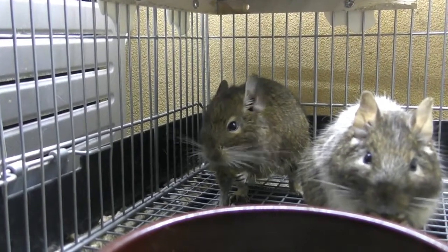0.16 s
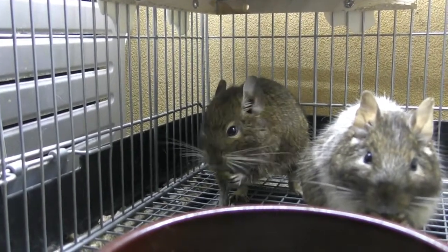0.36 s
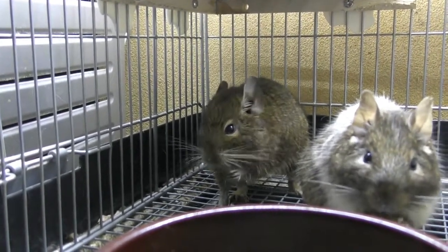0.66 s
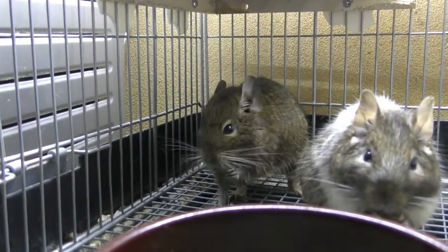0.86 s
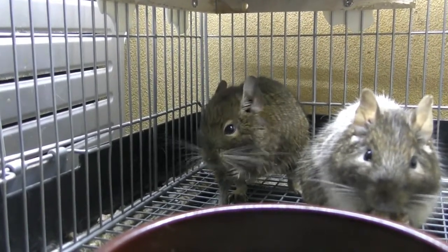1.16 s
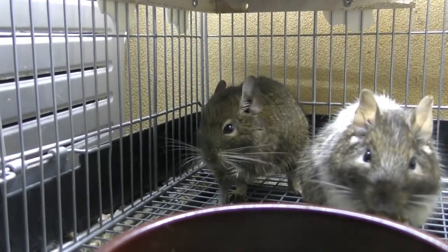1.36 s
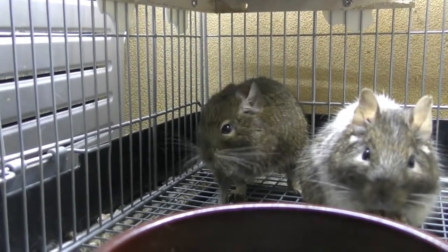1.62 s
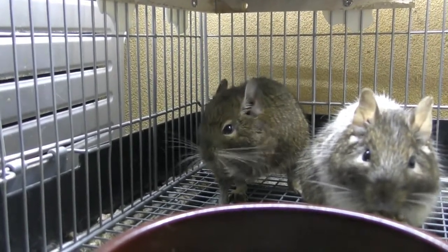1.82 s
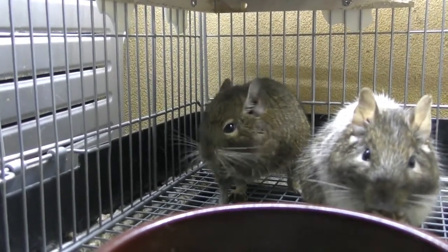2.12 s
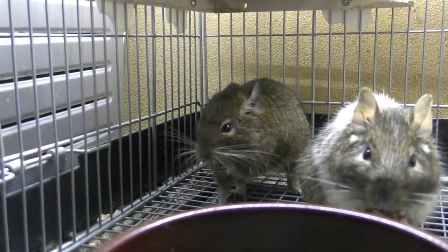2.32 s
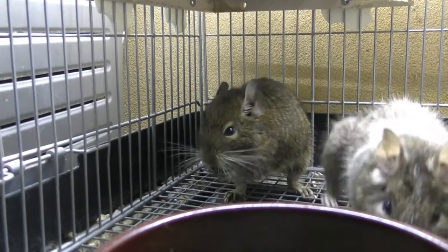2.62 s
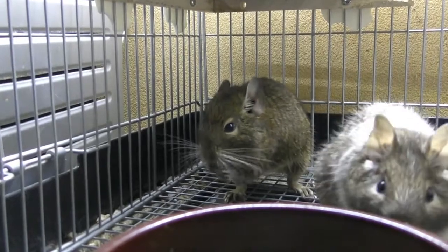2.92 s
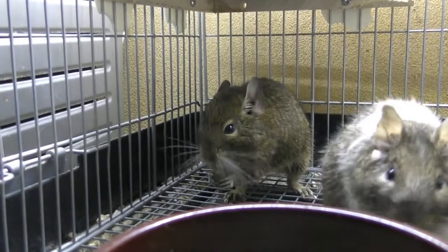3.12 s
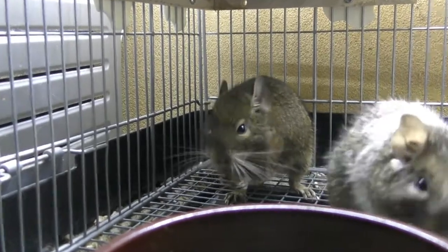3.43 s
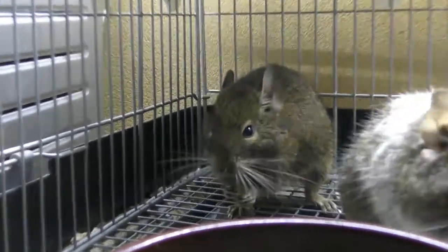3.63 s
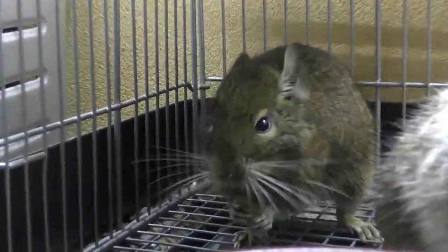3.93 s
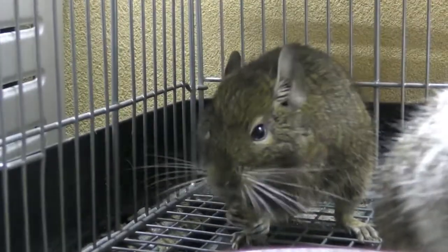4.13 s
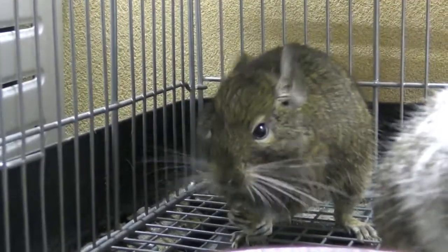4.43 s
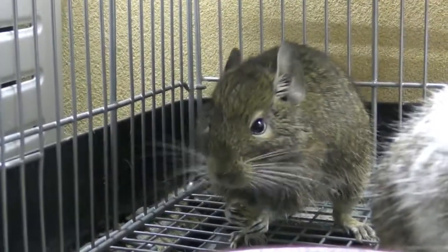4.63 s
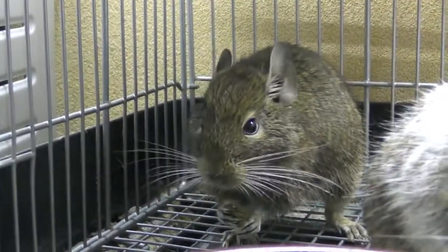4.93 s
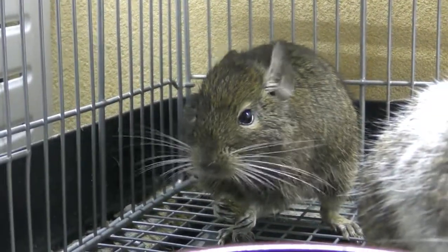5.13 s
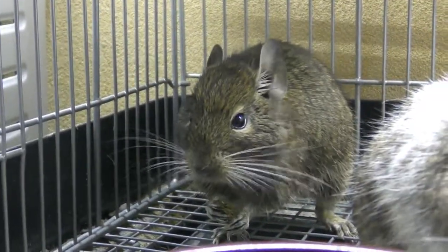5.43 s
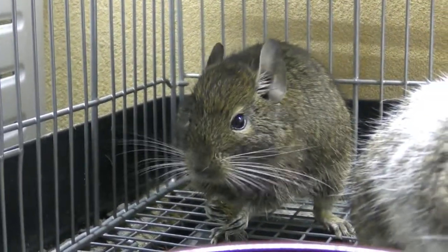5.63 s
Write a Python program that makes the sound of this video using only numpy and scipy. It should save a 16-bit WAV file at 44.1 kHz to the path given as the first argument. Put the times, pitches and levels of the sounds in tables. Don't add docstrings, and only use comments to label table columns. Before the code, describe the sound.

Indoors, close to a camera microphone, a degu in a wire cage gives short, piercing, whistle-like squeaks with rough edges, roughly two per second. A hollow wheel rumbles low at first and rolls to a stop within a second. Quick soft sniffs, sharp claw ticks on the wire floor and faint fur rustle fill the gaps, over steady fan rush with a thin whine.

```python
import sys
import numpy as np
from scipy import signal
from scipy.fft import rfft, irfft, next_fast_len
from scipy.io import wavfile
from scipy.ndimage import uniform_filter1d, minimum_filter1d, map_coordinates

SR = 44100
rng = np.random.default_rng(int(sys.argv[2]) if len(sys.argv) > 2 else 0)


def log_audio(samples):
    frames = np.atleast_2d(samples).T
    limited = np.clip(frames, -1, 1)
    pcm = np.round(limited * 32767).astype(np.int16)
    wavfile.write(sys.argv[1], SR, pcm)


def gain_from_db(level_db):
    decades = np.asarray(level_db, float) / 20
    return 10 ** decades


N = 254016

# [t/s, f/Hz]
SQUEAK_PITCHES = [
    [(.010, 3470), (.019, 3550), (.033, 4100), (.04, 3990), (.052, 4030), (.058, 4254)],
    [(.557, 4040), (.57, 4148)],
    [(.596, 4090), (.601, 4195)],
    [(.998, 2650), (1.015, 3350), (1.021, 3920), (1.026, 3880)],
    [(1.068, 4080), (1.074, 4115)],
    [(1.628, 3800), (1.646, 3680), (1.662, 3740), (1.669, 3440), (1.685, 3440), (1.695, 3244),
     (1.704, 3715)],
    [(1.995, 2980), (2.004, 3140), (2.013, 3710), (2.036, 3920), (2.047, 3650), (2.06, 4000)],
    [(2.360, 3590), (2.374, 3820), (2.408, 3890), (2.415, 4200)],
    [(2.790, 2253), (2.813, 3685), (2.832, 3870), (2.845, 3850), (2.853, 4200)],
    [(3.361, 3460), (3.367, 3460), (3.378, 4140), (3.399, 3997), (3.413, 4260)],
    [(3.893, 3610), (3.908, 3770), (3.923, 4210), (3.943, 4265), (3.95, 4415)],
    [(4.485, 3275), (4.495, 3250), (4.512, 3940), (4.527, 3994), (4.543, 4380)],
    [(5.108, 3090), (5.117, 3200), (5.124, 3620), (5.154, 3870), (5.165, 4360)],
]
# [level/dB, change over its length/dB, rough start t/s, settled chaos level/dB, release t/s]
SQUEAK_EFFORT = [(-16.5, -3, .022, -15, 0.018), (-17.5, -5.5, -0.0017, -31, .024),
                 (-30, -2, -0.018, -21, 0.0078), (-16, -4.5, .03, -1, .009), (-37, 0, -0.021, -28, 0.0044),
                 (-16.5, -7, 0.03, -40, 0.014), (-18.5, 2, .014, -34, 0.014),
                 (-20.5, -4, -.006, -34, 0.014), (-18, -2.5, 0.034, -30, 0.018),
                 (-18.5, 0, .016, -13, .018), (-20, 3.8, -.01, -5.5, .013), (-19, -1.5, 0.031, -16, 0.017),
                 (-17, -4, 0.032, -13, 0.017)]
# [brightness/dB per overtone, second overtone/dB, half-pitch level at start/dB, at end/dB]
SQUEAK_COLOUR = [(0.5, 5.5, -11, -24), (0, 9.5, -7.5, -46), (-3, 6, -29, -30), (.2, 3.5, -8, -10),
                 (-9.5, 8, -30, -30), (0.5, 4.5, -3, -63), (.4, 1.5, -18, -52), (-0.5, 1.5, -11, -39),
                 (-1, 0.5, -23, -48), (0, 1, -4, -19), (1, -2.5, -11, -8), (-0.5, -0.5, -14, -36),
                 (0, 1.5, -19, -30)]
# [f/Hz, level/dB]
THROAT = [(1500, -20.5), (3000, -12.5), (4000, -5), (4900, -14), (5600, -3), (7500, -2), (9500, -1),
          (12000, 0.5), (14500, -4.5), (16000, -14.5)]
# [t/s, peak level/dB]
SNIFFS = [(0.125, -46), (0.285, -48), (0.8046, -46), (0.9546, -41.5), (1.1648, -28), (1.3608, -32.5),
          (1.4846, -37), (1.5595, -31.5), (1.745, -33), (1.946, -28), (2.157, -31.5), (2.3426, -32),
          (2.579, -29), (2.7588, -28), (2.9892, -32), (3.1614, -27.5), (3.2908, -34), (3.5504, -32.5),
          (3.752, -28.5), (4.1025, -28), (4.2896, -29.5), (4.3966, -39), (4.6829, -29.5), (4.8748, -30),
          (5.0463, -35), (5.2542, -32), (5.441, -33.5), (5.6173, -28.5)]
# [f/Hz, level/dB per Hz]
NOSE = [(530, -10), (900, -10), (1170, 1.5), (1790, -12), (2330, -6.5), (3550, -8), (4410, -2),
        (5750, -14.5), (12100, -14.5), (16000, -17.5)]
# [t/s, peak level/dB, tilt/dB per octave]
CLAW_HITS = [(0.4165, -46, 9), (0.4753, -38, -5), (0.9757, -34, 5), (1.24, -35.5, 7), (1.498, -28.5, 1.5),
             (1.515, -30.5, 4.5), (1.5382, -23, 2), (1.5445, -21, 3.5), (1.629, -14, -1.5),
             (2.2833, -28, 2.5), (2.2983, -35, 1.5), (2.3138, -17, 2.1), (3.4877, -39, 1.1),
             (3.67, -35, 11), (3.7823, -27, 5), (4.0345, -36, -0.6), (4.1708, -35.5, 1.1),
             (4.211, -39.5, -3), (4.6453, -39.5, 4), (4.7436, -30.5, 0.7), (4.9524, -38, .1),
             (4.9584, -25, 2), (4.970, -19.5, 2), (4.9776, -18.5, 3), (4.9874, -22.5, 2), (5.204, -32, 2),
             (5.2274, -38.5, -1), (5.3791, -38, -0.6), (5.576, -32, .1), (5.7239, -33.5, -0.6)]
# [f/Hz, level/dB per Hz]
WIRE = [(410, -48.5), (700, -15), (1140, -9), (1640, -7), (2880, 0), (3240, -4.5), (4610, -6), (11100, -13),
        (16000, -18)]
# [t/s, level/dB]
WHEEL_LURCHES = [(.002, -29), (.05, -31), (.085, -30), (.118, -34), (.14, -36), (.337, -40), (.413, -36),
                 (.478, -32), (.52, -38), (.552, -31), (.6, -32), (.682, -36)]
# [f/Hz, width/Hz, level/dB]
WHEEL_MODES = [(95, 31, -5.5), (160, 106, 0.5), (259, 61, 1), (368, 106, 4), (461, 47, -6.5),
               (860, 78, -12.5), (1057, 50, -12), (1571, 46, -7), (1852, 92, -12), (2420, 40, -14),
               (3070, 35, -17.5), (4330, 40, -20)]
# [f/Hz, level/dB per Hz]
AIR = [(15, -39), (25, -2.5), (273, 3), (483, -1.5), (617, -12.5), (726, -9), (952, -10.5), (1180, -3),
       (1550, -8.5), (2150, -12), (4240, -13.5), (6380, -31), (12200, -28.5), (15200, -34.5), (16500, -40)]
# [f/Hz, likeness from -1 to 1]
AIR_ALIKE = [(60, 0.84), (150, 0.95), (380, 0.95), (950, 0.89), (2380, 0.5), (5980, 0.79), (15000, 0.83)]
# [f/Hz, left-right level/dB]
AIR_LEAN = [(60, 2), (240, 0.5), (950, 1), (3770, -2.5), (15000, -1)]
# [f/Hz, width/Hz, level/dB]
FAN_WHINES = [
    (1179.5, 25, -59),
    (1302, 62, -64.5),
    (722, 61, -62),
]
# [f/Hz, t/s]
CAGE_RING = [(1000, 0.25), (4000, 0.067), (12000, 0.052)]
# [f/Hz, left-right level/dB]
ANIMAL_BALANCE = [(60, -1.5), (130, -11.5), (290, 15), (640, -1.5), (1410, -9), (3100, -2.5), (6820, -1),
                  (15000, 1)]
# [f/Hz, phase/rad]
ANIMAL_LEAD = [(0, 0), (1290, -0.5), (3960, 0.84), (5600, 0.12), (11100, -0.07), (11500, 0.89),
               (14200, -1.3), (16400, -0.0)]


def unit(x):
    return x / np.sqrt(np.mean(x ** 2) + 1e-20)


def along(points, hz):
    f, value = np.transpose(points)
    return np.interp(np.log(hz + 1), np.log(f + 1), value)


def wobble(rate, size=N):
    knots = rng.standard_normal(int(size * rate / SR) + 4)
    return map_coordinates(knots, [np.arange(size) * rate / SR])


def filtered(x, response):
    m = next_fast_len(x.shape[-1] + 8192)
    spectrum = rfft(x, m) * response(np.fft.rfftfreq(m, 1 / SR))
    return irfft(spectrum, m)[..., :x.shape[-1]]


def noise(spectrum, size=N, tilt_db=0):
    def gain(hz):
        return gain_from_db(along(spectrum, hz) + tilt_db * np.log2((hz + 1) / 5000))
    return unit(filtered(rng.standard_normal(size), gain))


def add(track, s, sound):
    part = track[round(s * SR):][:len(sound)]
    part += sound[:len(part)]


def squeak_voice(hz, db, half_db, chaos, ending, bright_db, second_db):
    n = len(hz)
    uneven_hz = hz * (1 + 0.0042 * wobble(360, size=n))
    phase = 2 * np.pi * np.cumsum(uneven_hz) / SR + 0.3 * chaos * wobble(1498, size=n)
    tilt_db = bright_db + 0.26 * (db + 22.5) - 3 * ending

    def partial(k):
        colour_db = along(THROAT, k * hz) + tilt_db * (k - 2) + second_db * (k == 2)
        slow_db = 1.8 * np.minimum(wobble(231, size=n), .9)
        fast_db = 3 * chaos * np.minimum(wobble(650, size=n), .9)
        flutter_db = min(k, 2.5) * (slow_db + fast_db)
        return gain_from_db(colour_db + flutter_db) * (k * hz < 17000) * np.sin(k * phase)

    whole = unit(sum(partial(k) for k in range(1, 7)))
    half = unit(sum(partial(k + .5) * gain_from_db(-4.5 * (k < 2)) for k in range(5)))
    turbulence = noise(THROAT, size=n, tilt_db=3.0 + bright_db)
    rasp = unit(gain_from_db(3.4 * wobble(1400, size=n)) * turbulence)
    tone = np.sqrt(1 - .75 * chaos ** 2) * whole
    return tone + gain_from_db(half_db) * half + gain_from_db(-8) * chaos ** 1.3 * rasp


def squeaks():
    attack_s, attack_db, usual_release_s, release_db, droop = 0.017, -6, .014, -21, .07
    start_chaos_db, settle_s, fray_db, catch_s = -1.5, 0.016, -5, .0016
    track = np.zeros(N)
    for rows, effort, colour in zip(SQUEAK_PITCHES, SQUEAK_EFFORT, SQUEAK_COLOUR):
        level_db, change_db, rough_s, settled_db, release_s = effort
        bright_db, second_db, *halves_db = colour
        s, pitch = np.transpose(rows)
        n = round((s[-1] - s[0] + release_s) * SR)
        t = np.arange(n) / SR
        left = t[::-1] / release_s
        ending = np.maximum(1 - left, 0)
        hz = np.interp(s[0] + t, s, pitch) * (1 - droop * ending * release_s / usual_release_s)

        db = level_db + change_db * t / t[-1]
        db = db + attack_db * np.maximum(1 - t / attack_s, 0) + release_db * ending ** 1.38
        db = db + 0.84 * wobble(90, size=n)
        half_db = np.linspace(*halves_db, n) + 5 * np.minimum(wobble(73, size=n), 1)

        settling = np.clip((t - rough_s) / settle_s, 0, 1)
        chaos_db = start_chaos_db + (settled_db - start_chaos_db) * settling
        chaos_db = chaos_db + np.maximum(fray_db - settled_db, 0) * np.clip(2.2 - 1.75 * left, 0, 1)
        chaos = np.minimum(gain_from_db(chaos_db), .97)

        voice = squeak_voice(hz, db, half_db, chaos, ending, bright_db, second_db)
        to_edge = np.minimum(np.arange(n), np.arange(n)[::-1])
        edge = np.minimum(to_edge / (catch_s * SR), 1) ** 2
        add(track, s[0], gain_from_db(db + 7) * edge * voice)
        lead_in = np.linspace(0, 1, round(0.011 * SR)) ** 1.2
        add(track, s[0] - .006, gain_from_db(db.max() - 19.5) * lead_in * noise(THROAT, size=len(lead_in)))
    return track


def sniffs():
    rise_s = 0.01
    track, t = np.zeros(N), np.arange(SR // 5) / SR
    for s, db in SNIFFS:
        t60_s = 0.12 + .004 * (db + 29)
        swell = np.sin(np.pi / 2 * np.minimum(t / (2 * rise_s), 1)) ** 2
        trail = gain_from_db(-60 * np.maximum(t - 2.53 * rise_s, 0) / (1.85 * t60_s))
        level = gain_from_db(db - 12 + 0.89 * wobble(127, size=len(t)))
        add(track, s - .014, level * swell * trail * noise(NOSE, size=len(t)))
    return track


def claws():
    t60_s = 0.044
    track, t = np.zeros(N), np.arange(SR // 10) / SR
    for s, db, tilt_db in CLAW_HITS:
        decay = gain_from_db(db - 9.5 - 60 * t / t60_s + 3.3 * wobble(800, size=len(t)))
        onset = 1 - np.exp(-t / 0.00043)
        snap = 1 + 1.03 * np.exp(-t / 0.0013)
        add(track, s + .0002, decay * onset * snap * noise(WIRE, size=len(t), tilt_db=tilt_db))
    return track


def fur():
    still_db = -3 * (np.arange(N) < 0.92 * SR)
    stirring_db = 3.4 * wobble(30) + 2.2 * wobble(5.98)
    grain_db = 2.6 * wobble(300)
    return gain_from_db(-61.5 + still_db + stirring_db + grain_db) * noise(WIRE, tilt_db=2.5)


def cage(x):
    hz, t, z = signal.stft(rng.standard_normal((2, SR // 5)), SR, nperseg=128)
    decay = gain_from_db(-60 * t / along(CAGE_RING, hz)[:, None])
    tail = signal.istft(z * decay, SR, nperseg=128)[1]
    late = np.pad(x, (40, 0))[None]
    return signal.fftconvolve(late, tail / np.linalg.norm(tail[0]), axes=1)[:, :N]


def wheel():
    swell_db_per_s, fade_db_per_s = 1000, 180
    s, db = np.transpose(WHEEL_LURCHES)[..., None]
    since = np.arange(N) / SR - s
    lurches = gain_from_db(db + np.minimum(swell_db_per_s * since, -fade_db_per_s * since))
    level = np.sqrt(np.sum(lurches ** 2, axis=0))
    bumps = rng.standard_normal((2, N)) * gain_from_db(1.8 * wobble(59.9)) * [[1], [.15]]

    def body(f):
        modes = sum(gain_from_db(g) * (1j * f * w / (c * c - f * f + 1j * f * w)) ** 2 for c, w, g in WHEEL_MODES)
        return modes * (1 - 1.2 / (1 + ((f - 600) / 60) ** 2))

    mid, side = filtered(bumps, body)
    return level * unit(np.array([mid + side, mid - side]))


def fan_whine(centre_hz, width_hz):
    def peak(f):
        return 1 / (1 + (2 * (f - centre_hz) / width_hz) ** 2)
    return unit(filtered(rng.standard_normal(N), peak))


def air():
    def mid_side(hz):
        turn = np.arccos(np.clip(along(AIR_ALIKE, hz), -1, 1)) / 2
        level = gain_from_db(along(AIR, hz) - 5.5 * (hz > 2500) - 5.4 * (hz < 70))
        return level * [np.cos(turn), np.sin(turn)]

    def lean(hz):
        return gain_from_db(along(AIR_LEAN, hz) * [[.5], [-.5]])

    mid, side = filtered(rng.standard_normal((2, N)), mid_side)
    rush = unit(filtered(np.array([mid + side, mid - side]), lean))
    rush = rush * gain_from_db(-47.5 + .9 * wobble(5.35))
    spin_up = gain_from_db(np.interp(np.arange(N) / SR, [.7, 1.1], [-8, 0]))
    whines = sum(gain_from_db(db) * fan_whine(hz, width_hz) for hz, width_hz, db in FAN_WHINES)
    return rush + spin_up * gain_from_db([[-2.5], [2.5]]) * whines


def scene():
    near = squeaks() + sniffs() + claws() + fur()

    def ports(hz):
        balance = gain_from_db(along(ANIMAL_BALANCE, hz) + 0.95)
        lead = np.exp(1j * along(ANIMAL_LEAD, hz))
        return (balance * lead) ** [[.5], [-.5]]

    return filtered(near, ports) + gain_from_db(-7) * cage(near) + wheel() + air()


def band_limit(x):
    return signal.sosfilt(signal.butter(12, 16800, fs=SR, output="sos"), x)


def record(dry):
    power = uniform_filter1d(np.mean(dry ** 2, 0), 400)
    level_db = 10 * np.log10(np.abs(power) + 1e-12)
    needed_db = -.47 * np.clip(level_db + 31.5, 0, 22)
    hold, delay = round(0.027 * SR), round(0.0086 * SR)
    held_db = minimum_filter1d(np.pad(needed_db, (hold // 2 + delay, 0)), hold)[:N]
    gain = gain_from_db(uniform_filter1d(held_db, round(0.012 * SR)))

    def treble_limit(hz):
        return 1 - .985 / (1 + (15850 / (hz + 1)) ** 150)

    mix = filtered(dry * gain, treble_limit)
    return band_limit(mix)


dry = scene()
out = record(dry)
log_audio(out)
```